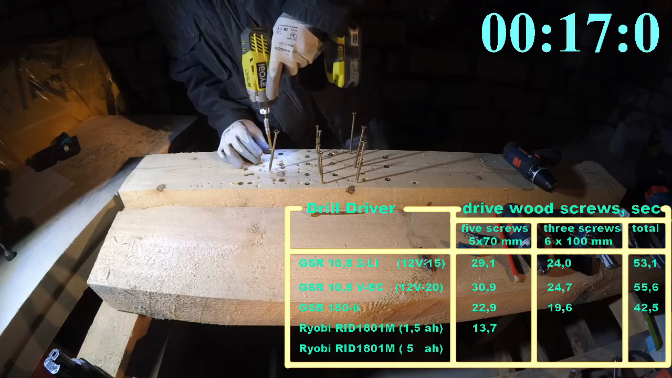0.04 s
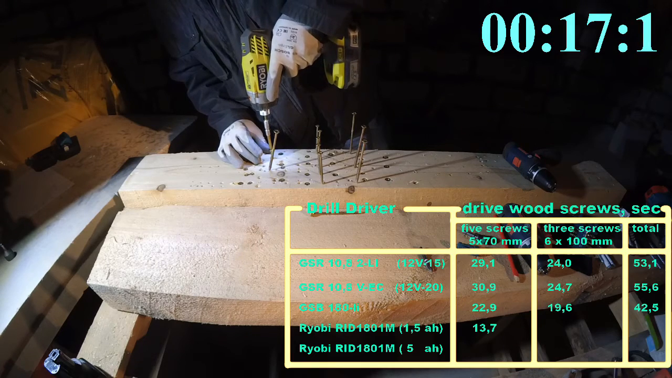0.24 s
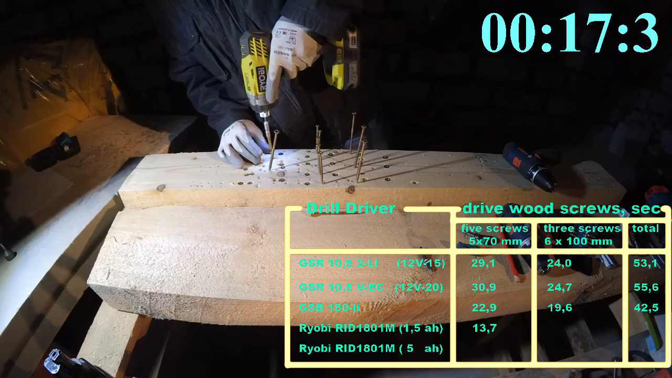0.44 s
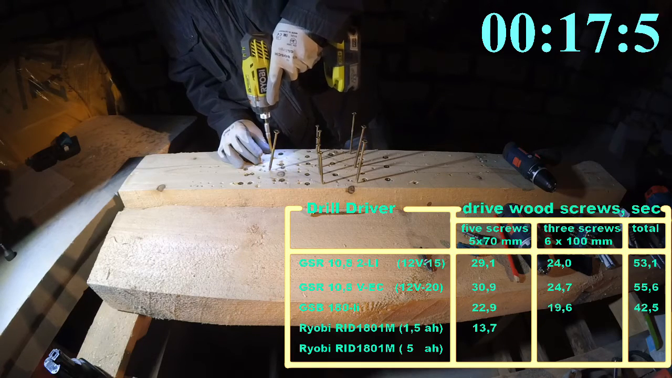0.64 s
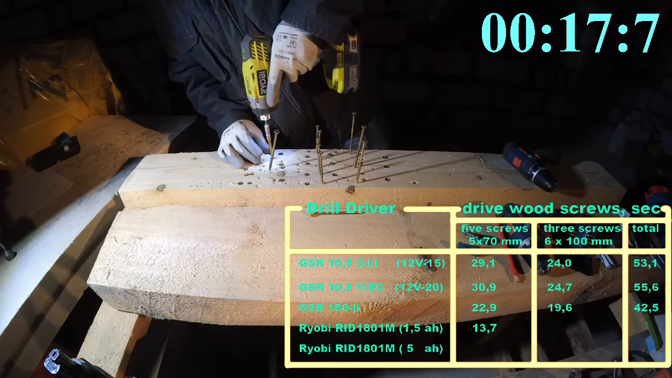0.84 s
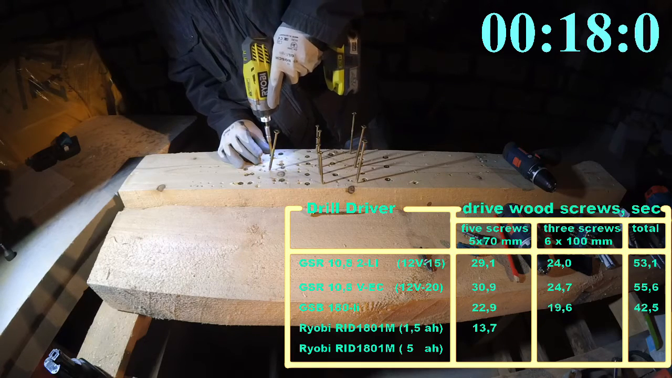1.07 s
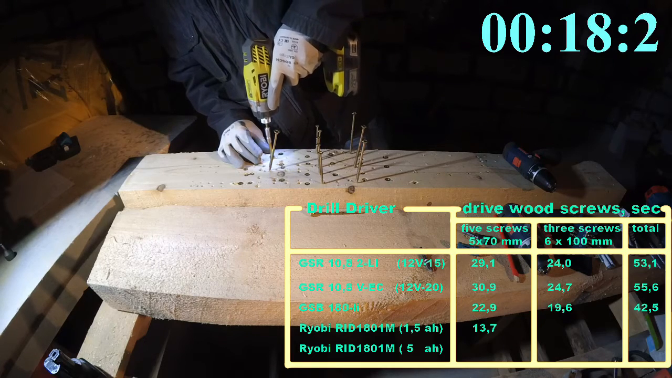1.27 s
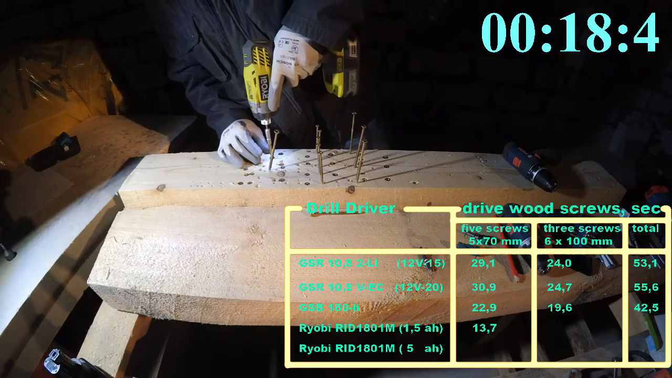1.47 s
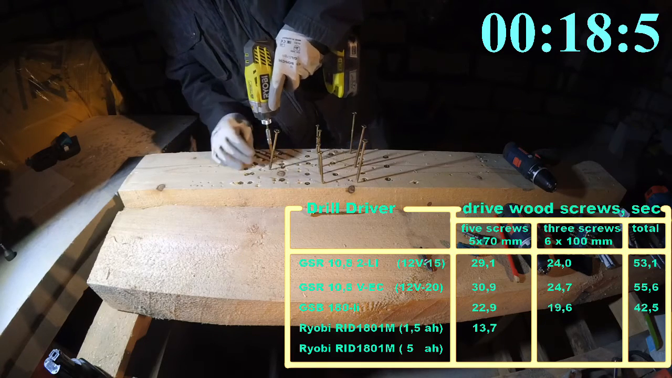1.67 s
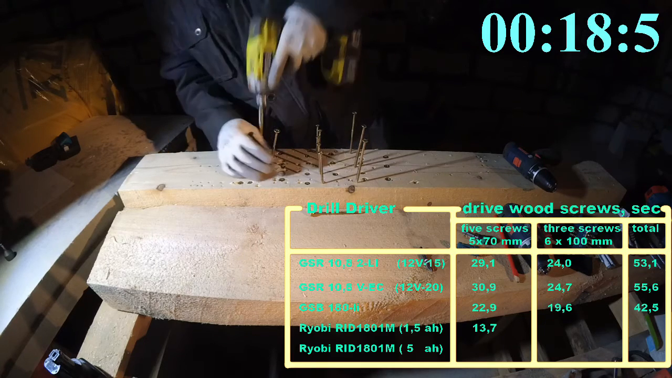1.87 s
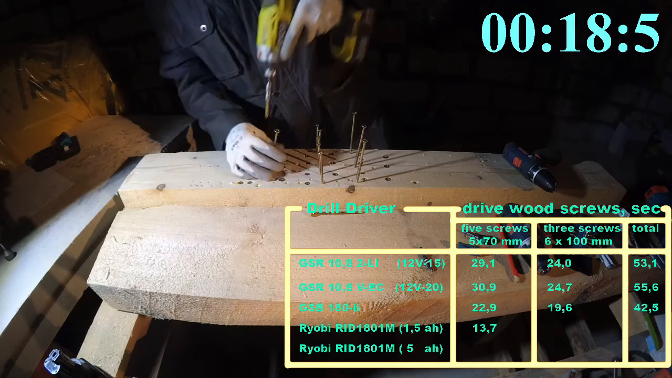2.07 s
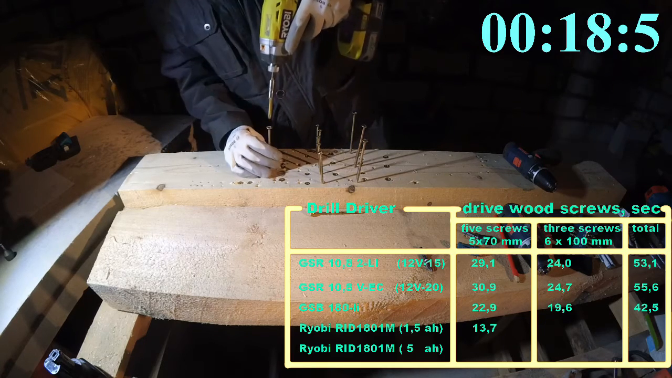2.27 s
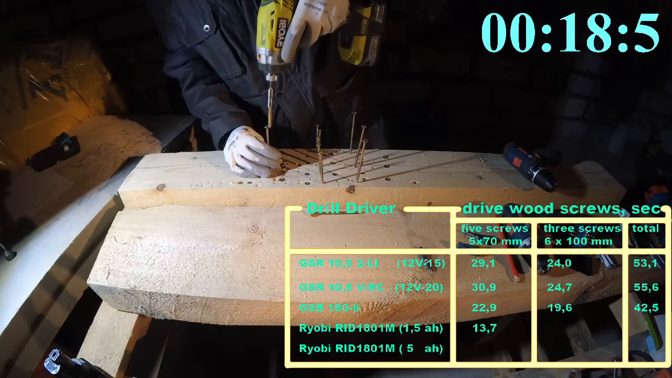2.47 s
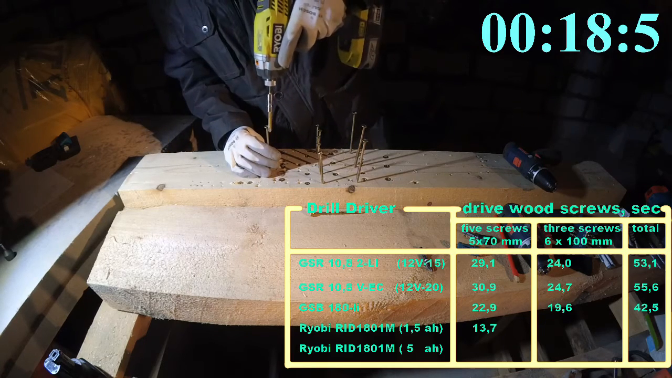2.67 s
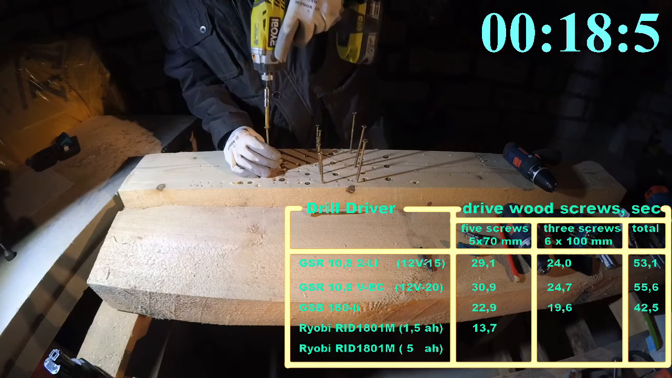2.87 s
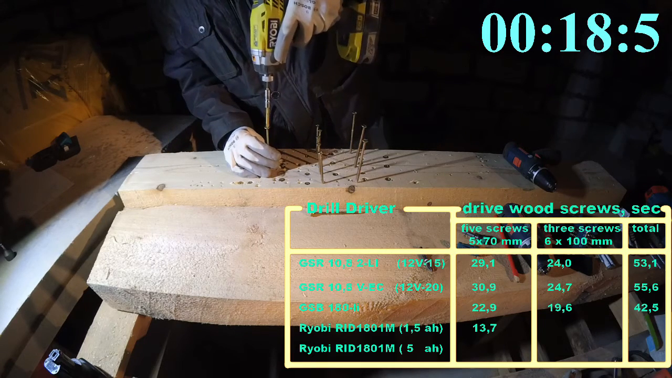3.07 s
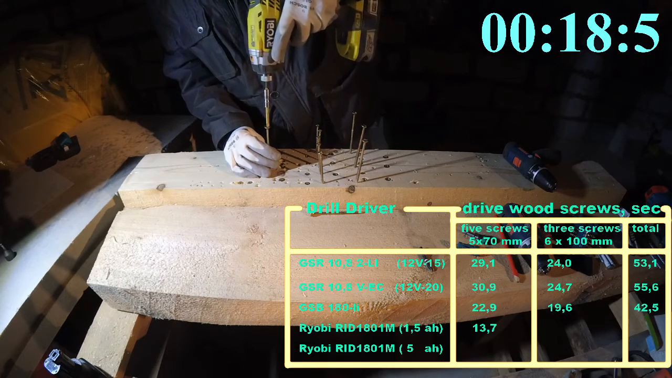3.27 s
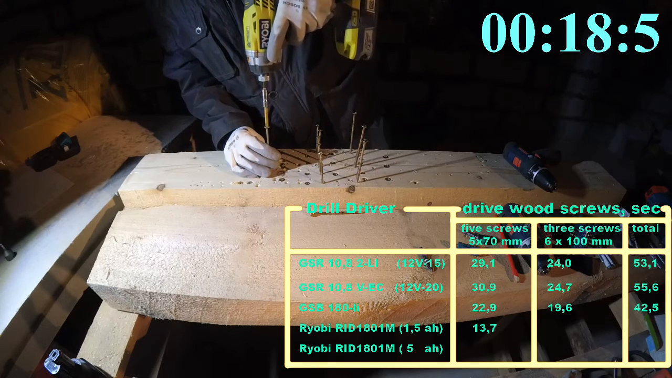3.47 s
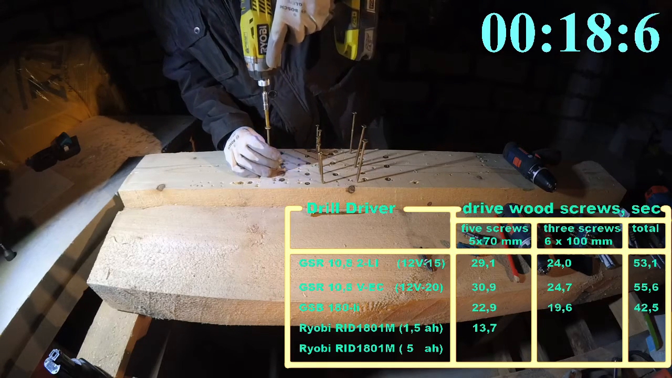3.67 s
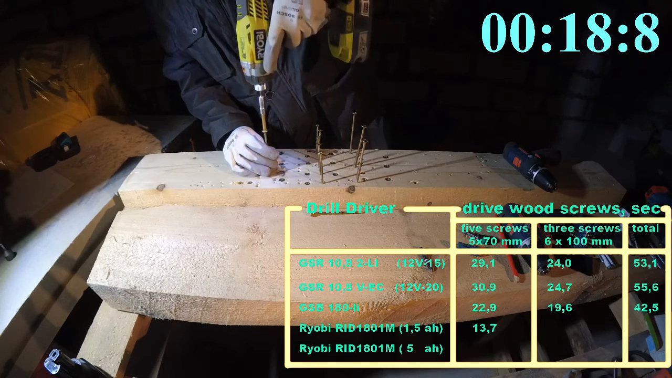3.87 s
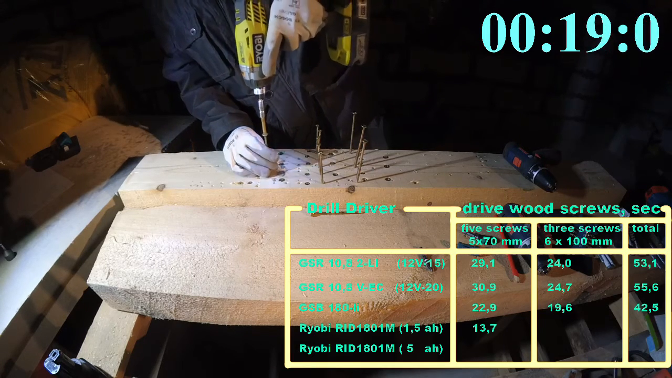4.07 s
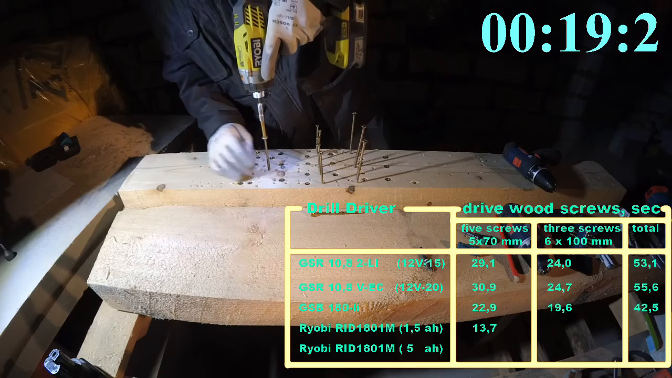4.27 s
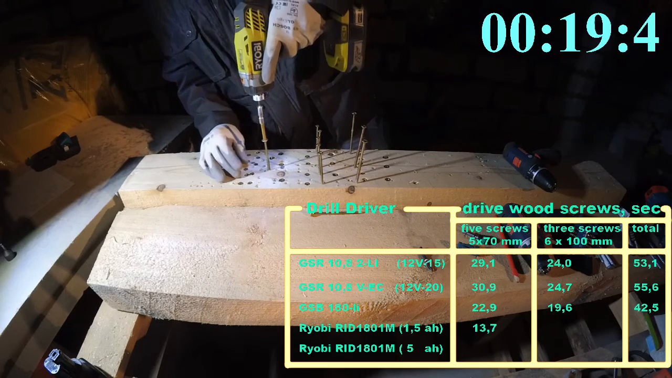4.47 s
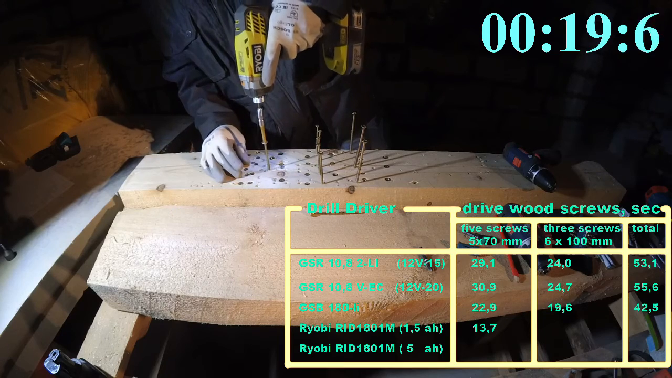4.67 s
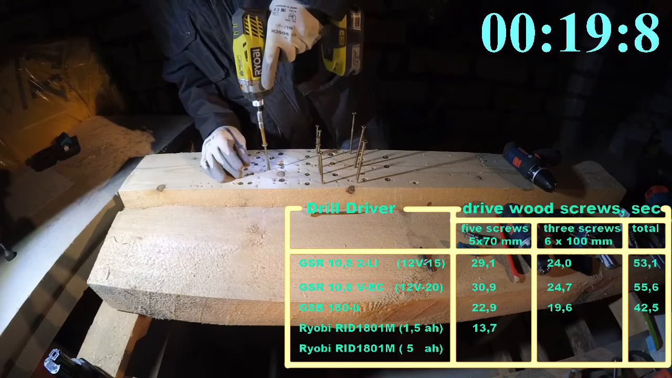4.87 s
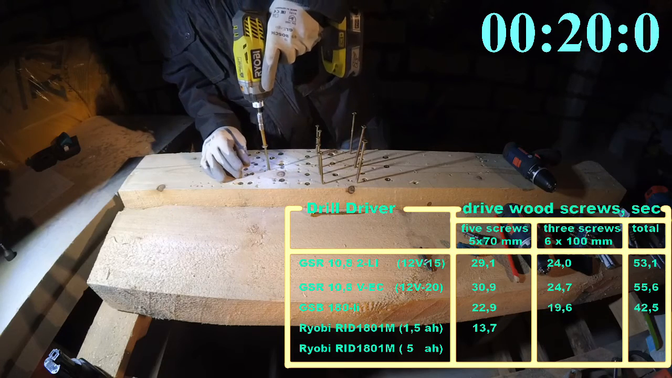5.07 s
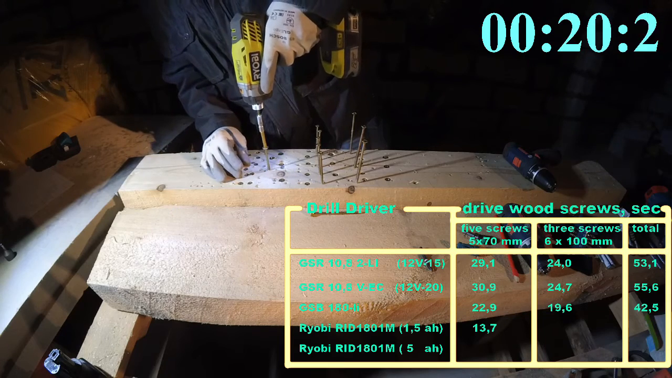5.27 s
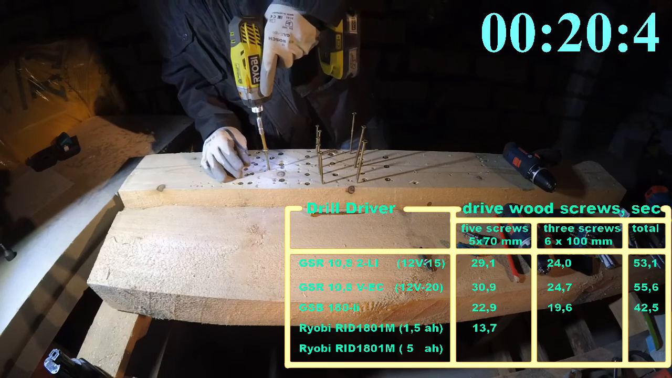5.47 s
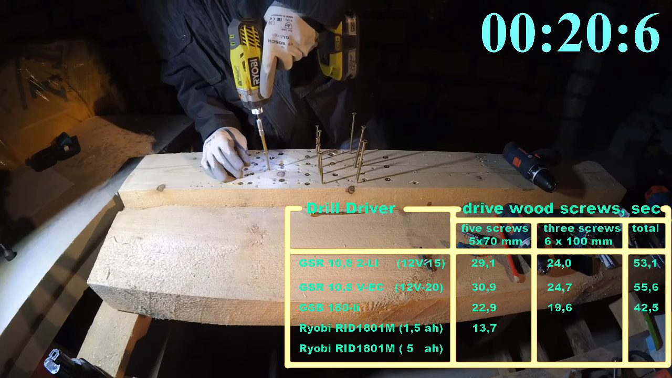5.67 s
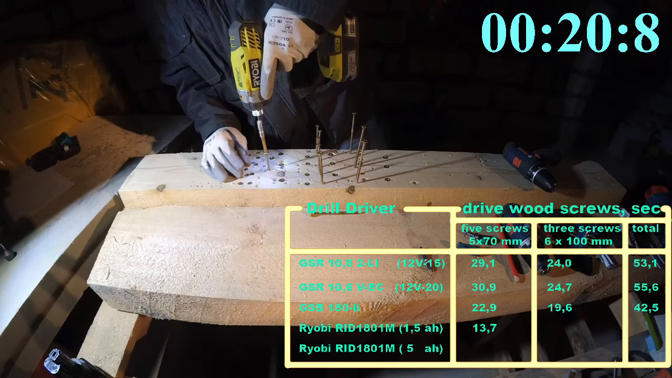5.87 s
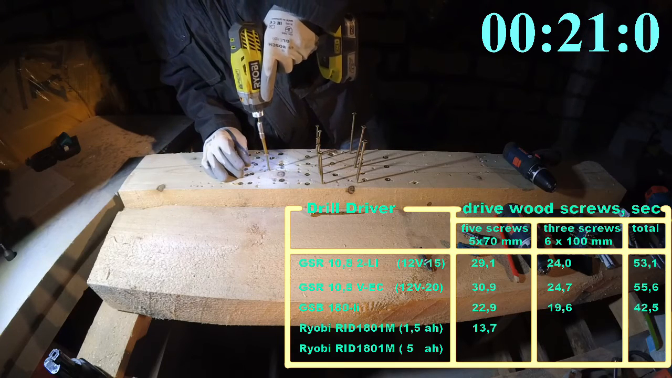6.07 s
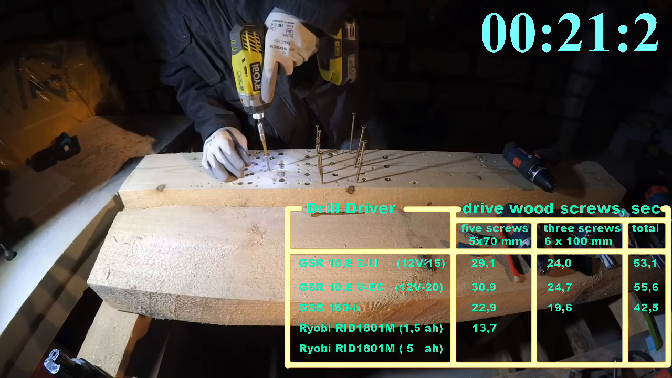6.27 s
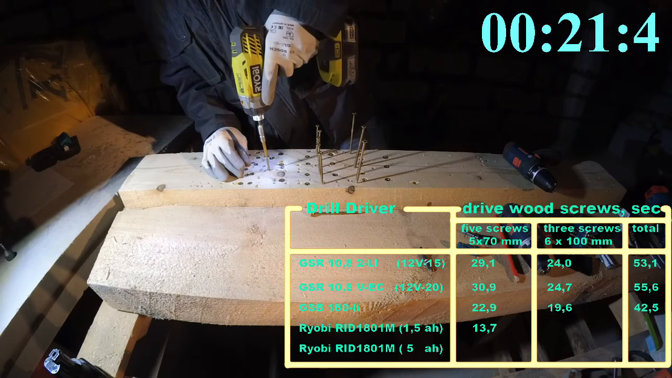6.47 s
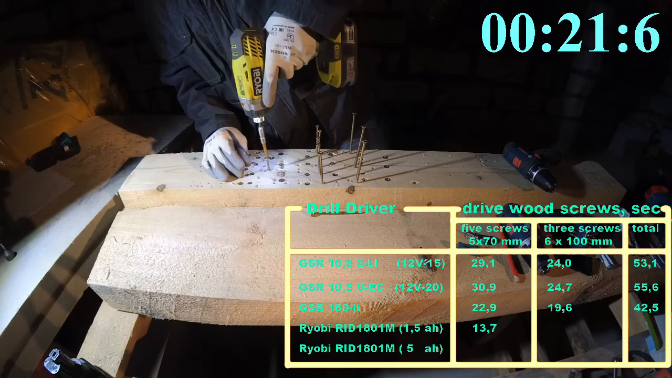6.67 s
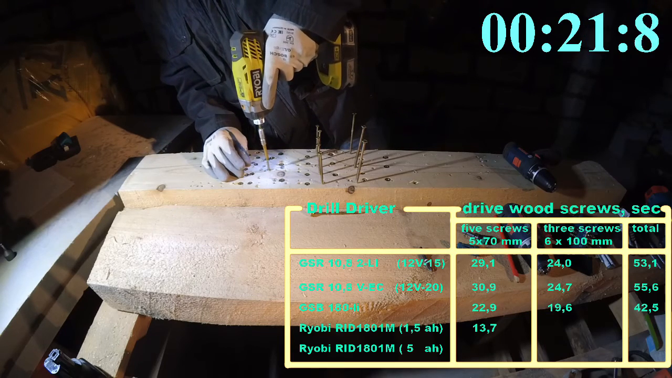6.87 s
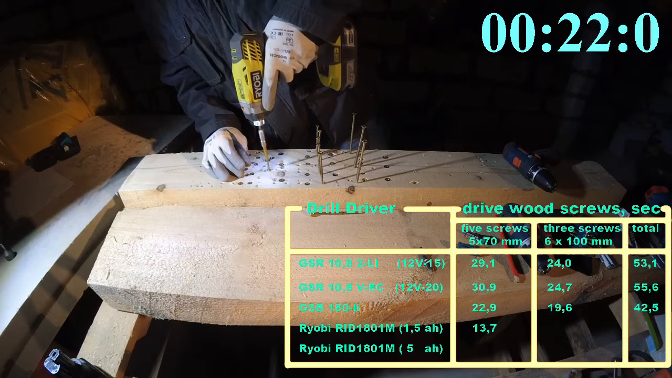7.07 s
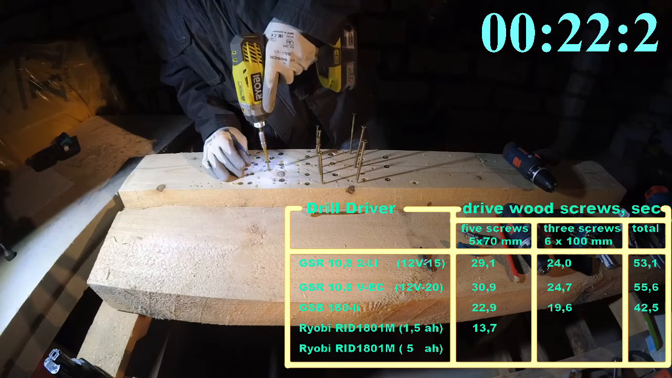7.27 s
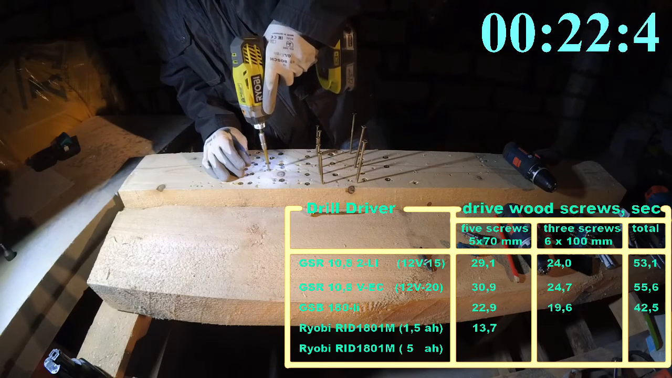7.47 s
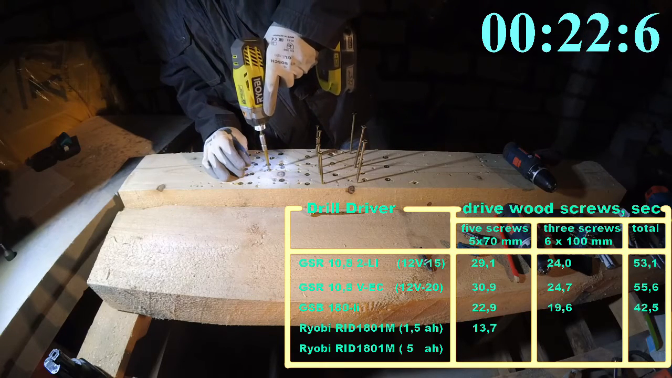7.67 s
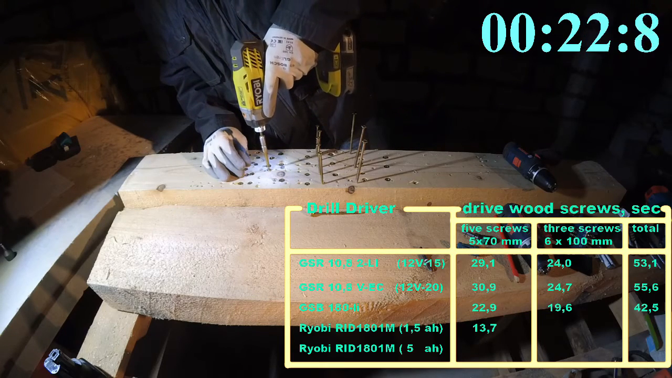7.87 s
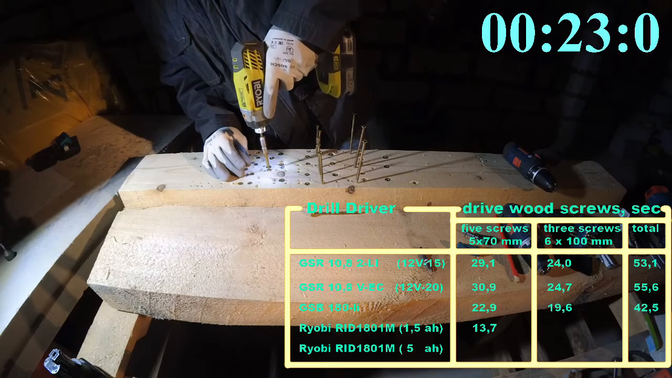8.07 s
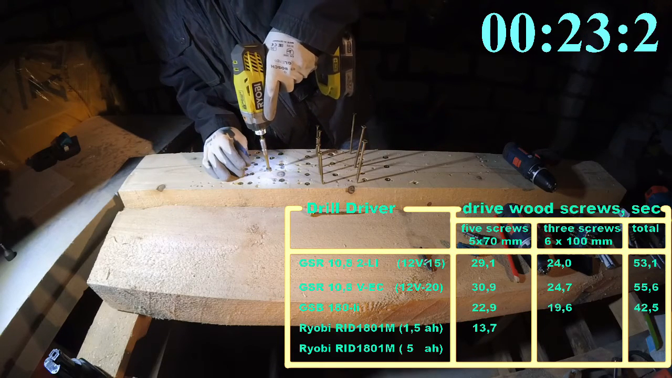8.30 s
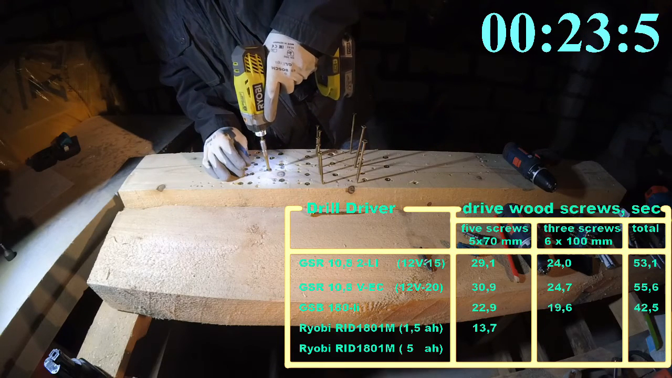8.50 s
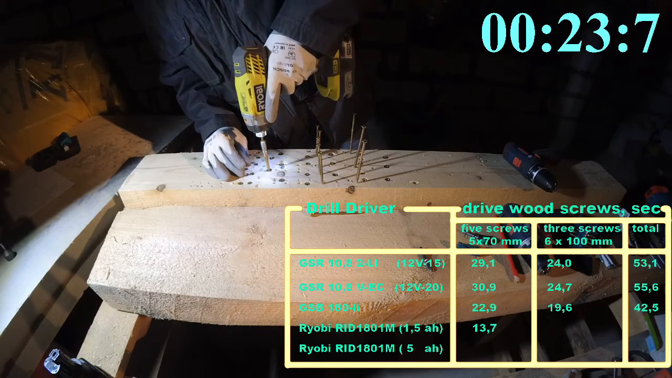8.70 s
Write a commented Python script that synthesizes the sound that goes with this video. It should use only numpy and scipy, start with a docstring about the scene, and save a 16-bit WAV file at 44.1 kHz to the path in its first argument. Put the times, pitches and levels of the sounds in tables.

```python
"""Rapid hammer blows over a whirring motor: a cordless impact driver sinks a screw into a timber beam.
Each blow is a burst of cracking noise that rings the screw and the beam, then a weaker rebound.
Between two screws the bit clicks into the new head and the motor spins freely as whirr and gear tones.
The second screw adds a squeal of wavering sines as it bites. A diffuse tail gives the small workshop;
the close mono microphone limits the peaks."""
import sys
import numpy as np
from scipy import signal
from scipy.fft import rfft, irfft
from scipy.io import wavfile
from scipy.ndimage import uniform_filter1d, minimum_filter1d

SR = 44100
rng = np.random.default_rng(int(sys.argv[2]) if len(sys.argv) > 2 else 0)


def to_wav(sig):
    """Store sig (one row per channel, or 1-D mono) as 16-bit WAV at the path in sys.argv[1].

    Samples outside -1..1 are clipped; the rate is SR.
    """
    pcm = np.clip(np.atleast_2d(sig), -1, 1) * 32767
    pcm = np.round(pcm).astype(np.int16)
    wavfile.write(sys.argv[1], SR, pcm.T)  # frames by channels


N = 385434
TIME = np.arange(N) / SR


def undb(db):
    """Turn decibels into an amplitude factor."""
    return 10 ** (np.asarray(db) / 20)


def unit(x):
    """Scale to rms 1."""
    return x / np.sqrt(np.mean(x ** 2))


def curves(rows):
    """Automation: columns of a table, joined by straight lines in time."""
    seconds, *columns = np.transpose(rows)
    return [np.interp(TIME, seconds, column) for column in columns]


def spectrum(points, hz):
    """Read a table on a log-frequency axis."""
    f, value = np.transpose(points)
    return np.interp(np.log(hz + 1), np.log(f), value)


def ring(x, response):
    """Play x through an impulse response."""
    return signal.oaconvolve(x, response)[:len(x)]


def colour(x, points, size=4096):
    """EQ with the given spectrum, as a causal minimum-phase filter with no pre-ring."""
    log_gain = np.log(undb(spectrum(points, np.fft.rfftfreq(size, 1 / SR))))
    cepstrum = irfft(log_gain)
    # folding the cepstrum onto positive time makes the filter causal
    cepstrum[1:size // 2] *= 2
    cepstrum[size // 2 + 1:] = 0
    return ring(x, irfft(np.exp(rfft(cepstrum)))[:size // 2])


def noise(points):
    """Coloured noise of rms 1."""
    return unit(colour(rng.standard_normal(N), points))


def modes(x, table):
    """Ring a set of damped resonances; a wider mode dies sooner."""
    t = TIME[:SR // 5]
    response = 0
    for hz, width_hz, db in table:
        decay = np.exp(-np.pi * width_hz * t)
        response = response + undb(db) * width_hz * decay * np.cos(2 * np.pi * hz * t)
    return ring(x, response / SR)


def walk(rate_hz):
    """Smoothed random drift of rms 1, with a new random value rate_hz times a second."""
    k = max(int(SR / rate_hz), 1)
    steps = np.repeat(rng.standard_normal(N // k + 1), k)
    return unit(uniform_filter1d(steps, k)[:N])


def taps(times, sizes):
    """One impulse for each event."""
    return np.bincount(np.clip(times * SR, 0, N).astype(int), sizes, N + 1)[:N]


def rattle(hits, rise_s, decay_s):
    """Each impulse becomes a short noisy swarm of metal contacts."""
    t = TIME[:SR // 20]
    shape = (1 - np.exp(-(t / rise_s) ** 2)) * np.exp(-t / decay_s)
    return ring(hits, shape) * rng.standard_normal(N)


def delay(x, lag_s):
    """The same sound, later."""
    return np.pad(x, (int(lag_s * SR), 0))[:N]


def envelope(start_s, end_s, attack_s, release_s):
    """Exponential attack, hold and release."""
    since, after = np.maximum(TIME - start_s, 0), np.maximum(TIME - end_s, 0)
    return (1 - np.exp(-since / attack_s)) * np.exp(-np.minimum(after / release_s, 20))


# colour of the quiet air: pitch_hz, level_db
AIR_COLOUR = [(200, 4), (400, -1), (650, -2.5), (900, 0.5), (1300, -4), (2000, -16), (3500, -26),
              (8000, -27), (15000, -33)]


def air():
    """Quiet noise floor, weighted to the low end, with a slow uneven level."""
    return noise(AIR_COLOUR) * undb(-48 + 1.1 * walk(9))


# colour of the low rumble: pitch_hz, level_db
RUMBLE_COLOUR = [(12, -1.5), (24, 7), (45, -4.5), (80, -11.5), (150, -15.5), (260, -28), (600, -59)]


def rumble(rest_db=-49.5, swell_db=-35.8):
    """Low noise that swells while the tool is moved to the next screw."""
    moving = envelope(start_s=1.65, end_s=3.0, attack_s=.12, release_s=.55)
    return noise(RUMBLE_COLOUR) * (undb(rest_db) + undb(swell_db) * moving)


# the beam shifts as the worker's weight comes off and goes back on: start_s, end_s, level_db
BEAM_BUMPS = [(1.6, 1.69, -32.5), (3.51, 3.69, -37)]
# colour of these bumps: pitch_hz, level_db
BUMP_COLOUR = [(25, -14), (65, 0), (120, 0), (180, -7), (300, -24), (800, -55)]


def bumps(attack_s=.02, release_s=.09):
    """Dull knocks of the beam shifting on its trestle: low noise in short envelopes."""
    level = sum(undb(db) * envelope(start_s, end_s, attack_s, release_s) for start_s, end_s, db in BEAM_BUMPS)
    return noise(BUMP_COLOUR) * level


# colour of brushing cloth: pitch_hz, level_db
CLOTH_COLOUR = [(200, -16), (900, 2), (2500, -3), (6000, -8), (10000, -12), (15000, -22)]


def sleeve():
    """The sleeve brushes along as the tool is lifted: unevenly fluttering noise."""
    stroke = envelope(start_s=1.79, end_s=2.03, attack_s=.03, release_s=.22)
    return noise(CLOTH_COLOUR) * stroke * undb(-51 + 1.4 * walk(40.2) + 2 * walk(600))


# bit, screw head and trigger being handled: start_s, relative level_db, decay_s, tilt_db_per_octave
HANDLING_CLICKS = [(2.155, -53, .003, 6), (2.209, -42, .002, 3), (2.351, -54, 0.016, 0),
                   (2.507, -38, 0.0053, 0), (2.533, -32, .004, 3), (2.543, -26, 0.0055, 1.5),
                   (2.799, -51, 0.03, -3), (2.834, -47, .016, 0), (2.994, -38, 0.012, 0),
                   (3.016, -39.5, 0.018, -4), (3.312, -34, .003, 0), (3.324, -35, .003, 3),
                   (3.331, -32, .004, 0), (3.354, -38, 0.0096, -3), (3.374, -37, 0.0073, -4),
                   (3.495, -45, .003, 5), (3.540, -27.5, 0.0024, -.5), (3.593, -51, .012, 7),
                   (3.619, -23, 0.0019, 2), (3.664, -17.5, 0.0022, 1.5)]
# colour of the direct click: pitch_hz, level_db
CLICK_COLOUR = [(100, 2), (500, -2.5), (900, 2), (1500, 0.5), (3000, -0.5), (4800, -4), (8000, -4.5),
                (15000, -20)]


def handling():
    """Small gritty contacts of steel on steel, decaying noise that also wakes the beam and the screw."""
    out, t = np.zeros(N), TIME[:SR // 6]
    hz = np.fft.rfftfreq(len(t), 1 / SR)
    lead = SR // 100  # room for the tilt filter to spread ahead of the click
    for start_s, db, decay_s, tilt_db in HANDLING_CLICKS:
        grit = rng.standard_normal(len(t)) * np.exp(-t / decay_s)
        tilt = undb(tilt_db * np.log2((hz + 500) / 4000))
        tilted = irfft(rfft(np.roll(grit, lead)) * tilt, len(t))
        start = int(start_s * SR) - lead
        out[start:start + len(t)] += undb(db) * tilted
    click = undb(5) * colour(out, CLICK_COLOUR)
    return click + undb(21) * modes(out, BEAM_MODES) + undb(2) * modes(out, SCREW_2_MODES)


# trigger pulls: start_s, load_s (screw takes the load), end_s, relative loaded level_db
TRIGGER_PULLS = [(-1, -.9, 1.65, -20.5), (3.625, 3.88, 9, -22)]
# colour of the fan and gear whirr: pitch_hz, level_db
WHIRR_COLOUR = [(59, -26), (100, -12), (126, -5.5), (184, -19.5), (467, -19.5), (825, -6), (1180, -9.5),
                (2000, -9.5), (2270, -7), (2690, -7), (4560, -2.5), (15500, -12)]
# the motor spinning freely: time_s, shaft_turns_per_s
SHAFT_SPEED = [(3.63, 366.0), (3.7, 385.5), (3.724, 364.9), (3.774, 405.5), (3.852, 364.9), (3.91, 371.2)]
# gear and commutator tones: multiple of the shaft rate, relative level_db
GEAR_TONES = [(6, 2), (8, -12), (10, -6), (11, -13), (12, 0.5), (14, -9.5)]
SPIN_UP_S, LOAD_S, RUN_DOWN_S = .012, .035, .026
PRESSED_HOME_S = 3.85  # the bit is fully home in the screw head


def motor():
    """Fan and gear whirr that grows under load, with tones at multiples of the free shaft rate."""
    gain = 0
    for start_s, load_s, end_s, loaded_db in TRIGGER_PULLS:
        free = undb(-29.7) * envelope(start_s, end_s, SPIN_UP_S, RUN_DOWN_S)
        loaded = undb(loaded_db) * envelope(load_s, end_s, LOAD_S, RUN_DOWN_S)
        gain = gain + np.maximum(free, loaded)
    whirr = noise(WHIRR_COLOUR) * gain * undb(3.3 * walk(400) + 2)

    turns_per_s, = curves(SHAFT_SPEED)
    phase = 2 * np.pi * np.cumsum(turns_per_s * (1 + .004 * walk(300))) / SR
    whine = sum(np.sin(order * phase) * undb(db + 2 * walk(120)) for order, db in GEAR_TONES)
    # louder by 85 dB per second until the bit is pressed home, then fading as the screw takes the load
    whine_db = -27 + 85 * np.minimum(TIME - PRESSED_HOME_S, 0)
    pressed = envelope(TRIGGER_PULLS[-1][0], PRESSED_HOME_S, SPIN_UP_S, release_s=.06)
    return whirr + whine * pressed * undb(whine_db)


def squeal(row, waver=0.00708, flutter_db=3, settle_s=.17):
    """A thin sine that settles in pitch, wavers and flutters."""
    start_s, end_s, first_hz, settled_hz, db, attack_s, release_s = row
    settling = np.exp(-np.maximum(TIME - start_s, 0) / settle_s)
    hz = settled_hz + (first_hz - settled_hz) * settling
    phase = 2 * np.pi * np.cumsum(hz * (1 + waver * walk(350))) / SR
    return np.sin(phase) * envelope(start_s, end_s, attack_s, release_s) * undb(db + flutter_db * walk(130))


# the closing trigger: start_s, end_s, first_hz, settled_hz, level_db, attack_s, release_s
TRIGGER_SONG = (3.603, 3.632, 7450, 6800, -44, .005, .015)


def trigger_tone():
    """The speed control sings briefly as the trigger closes: one thin, high sine."""
    return squeal(TRIGGER_SONG)


# thread in the wood: start_s, end_s, first_hz, settled_hz, relative level_db, attack_s, release_s, # dip_db
# (deepest dip, at each blow)
THREAD_SQUEALS = [(3.919, 3.935, 4300, 4320, -16, .005, .007, 0),
                  (3.95, 4.03, 4530, 4850, -26, .01, .02, 0), (4.05, 4.17, 4640, 4110, -13, .045, .45, 4),
                  (4.55, 5.4, 4100, 4110, -16, .25, 3.2, 15)]


def thread_squeal(loudest_cycle=.54):
    """The second screw squeals in the wood, swelling about half a cycle after each blow as it turns."""
    hammering = TIME >= BLOW_RATE_2[0][0]
    turns = np.cumsum(curves(BLOW_RATE_2)[0] * hammering) / SR
    resting = np.sin(np.pi * (turns - loudest_cycle)) ** 2
    return sum(squeal(row, waver=0.00791, flutter_db=2) * undb(-dip_db * resting)
               for *row, dip_db in THREAD_SQUEALS)


def hammer(rate, lone, rebound_db=-8, rebound_share=.53, scatter_db=1.0, rebound_scatter_db=1.5,
           jitter_s=.00017, rebound_jitter_s=.00042):
    """Impulses of the hammer on the anvil, and of its rebound about half a cycle later."""
    hz, = curves(rate)
    on = (TIME >= rate[0][0]) & (TIME <= rate[-1][0])
    turns = np.cumsum(hz[on]) / SR
    times = np.interp(np.arange(turns[-1]), turns, TIME[on])
    chance = rng.standard_normal((4, len(times)))
    times = times + jitter_s * chance[0]
    blows = taps(times, undb(scatter_db * chance[1])) + taps(lone[:, 0], undb(lone[:, 1]))
    back = times + rebound_share / np.interp(times, TIME, hz) + rebound_jitter_s * chance[2]
    rebounds = taps(back, undb(rebound_db + rebound_scatter_db * chance[3]))
    return blows, rebounds, on


# hammering on each screw: time_s, blows_per_s
BLOW_RATE_1 = [(0.023, 50.57), (0.9, 50.36), (1.15, 50.63), (1.4, 52.28), (1.62, 55.32)]
BLOW_RATE_2 = [(4.047, 43.5), (4.15, 46.92), (4.55, 49.77), (4.75, 48.31), (5.3, 49.7), (6.4, 50.56),
               (7.0, 50.41), (8.35, 51.78), (8.75, 55.62)]
# single blows and rebounds as the hammer stops and starts: time_s, level_db against a steady blow
SINGLE_BLOWS = [(1.636, 3), (1.655, -9), (1.664, 3), (1.677, -11), (1.702, -5), (1.721, -16), (1.749, -25),
                (3.912, -9), (3.941, -1), (3.971, -1), (3.999, 2), (4.023, 2.5)]
# each screw at the steady pace, rows crack, screw ring, thud: relative level_db,
# change_db_per_s as the screw sinks
BLOW_STRENGTH_1 = [(-20.2, 1.2), (-17.2, .6), (-29.3, 2.2)]
BLOW_STRENGTH_2 = [(-11.9, -1.15), (-15.4, -.2), (-26.7, -.3)]
# effect of pace, rows crack, screw ring, thud: loss_db per blow/s below the steady pace,
# gain_db per blow/s above it
PACE_RESPONSE = [(.65, .75), (1.05, -.1), (.5, .3)]
# level of the beam's ring under each screw: time_s, relative level_db
BEAM_LEVEL_1 = [(0.0, -17.8), (0.2, -27.7), (0.6, -23.7), (0.7, -28.4), (1.2, -30.4), (1.7, -21.9)]
BEAM_LEVEL_2 = [(4.05, -29.9), (5.35, -26.5), (5.87, -30.3), (6.65, -23.4), (7.69, -23.8), (7.95, -27.4),
                (8.47, -23.0), (8.73, -28.1)]
# modes of bit and screw: pitch_hz, width_hz, relative level_db
SCREW_1_MODES = [(1335, 70, -2), (1645, 77, -10.5), (1910, 140, -8.5), (2140, 130, -5), (2980, 54, -10),
                 (3140, 70, -4.5), (3350, 73, -5.5), (3770, 190, 2.5), (4074, 63, 3)]
SCREW_2_MODES = [(1370, 97, -3.5), (1928, 220, 2), (2120, 84, -24), (2510, 67, -5.5), (2890, 105, 5),
                 (3045, 79, -5), (3060, 47, -17), (3710, 150, 5.5), (4004, 63, 2.5)]
# modes of the beam along and across the grain: pitch_hz, width_hz, relative level_db
BEAM_MODES = [(836.5, 12.8, 14), (876, 35, -4), (747, 14, -24), (1280, 34, -18.5)]
# low beam modes as each screw wakes them: pitch_hz, width_hz, relative level_db
THUD_1_MODES = [(100, 27, -12), (157, 4.6, 6), (201, 24, -9), (352, 35, -2.5), (451, 14, 5),
                (263, 30, -15.5)]
THUD_2_MODES = [(97, 43, -15.5), (156.1, 4, 2), (190, 30, -13), (279, 26, -5.5), (352.2, 15, 1),
                (390, 27, -4.5), (462.7, 19, 1), (568, 60, -10.5)]
# colours of the crack, the bit's knock and the dull push on the beam: pitch_hz, level_db
CRACK_COLOUR = [(200, -20.5), (1000, -13), (3000, -3), (5000, -2), (7700, 1.5), (9300, -1), (11000, -8),
                (13000, -14), (15500, -19.5)]
KNOCK_COLOUR = [(40, -45.5), (250, 2.5), (600, -7.5), (1100, 2.5), (1600, -0.5), (2400, -2), (3500, 13),
                (4500, -12.5), (7000, -19), (15000, -35)]
PUSH_COLOUR = [(25, -5), (50, 4.5), (100, -0.5), (200, -3.5), (600, 2.5), (1200, -34.5), (5000, -61)]
# the hammer labours below this pace as the thread bites and races above it as the head seats
STEADY_BLOWS_PER_S = 50.5


def drive(rate, strength, beam_level, screw_modes, thud_modes):
    """One screw: a crack on each blow, then bending waves down the screw and into the beam."""
    first_s, last_s = rate[0][0] - .5, rate[-1][0] + .5
    lone = np.array([row for row in SINGLE_BLOWS if first_s < row[0] < last_s])
    blows, rebounds, on = hammer(rate, lone)
    sinking_s = np.cumsum(on) / SR
    pace = curves(rate)[0] - STEADY_BLOWS_PER_S
    crack_db, screw_db, thud_db = (db + db_per_s * sinking_s + pace * np.where(pace < 0, *slopes)
                                   for (db, db_per_s), slopes in zip(strength, PACE_RESPONSE))
    # the beam hardly rings until the thread has gripped it: 1 dB lost per blow/s below the steady pace
    beam_db = curves(beam_level)[0] + np.minimum(pace, 0)

    def level(x, db=0):
        """Scale to rms 1 during the hammering, then apply a gain."""
        return x * undb(db) / np.sqrt(np.mean(x[on] ** 2))

    crack = colour(rattle(blows + undb(-5) * rebounds, rise_s=.00033, decay_s=.0011), CRACK_COLOUR)

    # the screw takes a clean shove and the chatter of the bit in its head
    shove = delay(blows + undb(6) * rebounds, .0008)
    contact = level(rattle(shove, rise_s=.00023, decay_s=.002))
    screw_ring = modes(level(shove, 1.2) + contact, screw_modes)
    knock = colour(level(shove, -12.5) + contact, KNOCK_COLOUR)
    metal = level(screw_ring, -0.91) + level(knock, -6.5)

    # the wood feels each blow as one push, with a little scraping of the thread
    push = level(blows + undb(-7) * rebounds)
    beam = modes(delay(push + level(contact, -5.5), .00218), BEAM_MODES)
    low_ring = modes(push + level(contact, -13.5), thud_modes)
    thud = level(low_ring) + level(colour(push, PUSH_COLOUR), -4.5)

    wood = level(beam, beam_db + .5) + level(thud, thud_db)
    return level(crack, crack_db + 3.2) + level(metal, screw_db) + wood


# workshop decay: pitch_hz, t60_s
ROOM_DECAY = [(125, 1), (500, 0.72), (1300, 0.6), (2200, 0.49), (4000, 0.41), (8000, 0.27), (15000, 0.28)]


def diffuse(build_s=.0099):
    """Impulse response of the workshop: a dense noise tail that loses its treble first."""
    t = TIME[:SR * 3 // 4]
    hz = np.fft.rfftfreq(len(t), 1 / SR)
    white = rfft(rng.standard_normal(len(t)))
    edges = np.geomspace(180, SR / 2, 25)
    tail = 0
    for lo, hi in zip(edges, edges[1:]):
        band = irfft(white * ((hz >= lo) & (hz < hi)), len(t))
        t60_s = spectrum(ROOM_DECAY, np.sqrt(lo * hi))
        tail = tail + band * undb(-60 * t / t60_s)
    tail = tail * (1 - np.exp(-(t / build_s) ** 2))
    tone = [(200, -15), (450, -13.5), (800, -6), (2000, -3), (6000, -5.5), (15000, -6.5)]  # pitch_hz, level_db
    return colour(tail / np.sqrt(np.sum(tail ** 2)), tone)


def workshop(x, wet_db=-4.0, drift_hz=1.1):
    """Two near reflections and a diffuse tail whose pattern shifts as the tool and the worker move."""
    angle = 2 * np.pi * drift_hz * TIME
    wet = np.cos(angle) * ring(x, diffuse()) + np.sin(angle) * ring(x, diffuse())
    echoes = undb(-20.5) * delay(x, .0079) + undb(-19) * delay(x, .0118)
    near = signal.lfilter([1, -1], [1, -.85], echoes)  # thins the lows of the reflections
    return x + near + undb(wet_db) * wet


def scene(squeal_direct_db=-2, squeal_room_db=-9):
    """Tool, hands and room at one microphone, over a quiet floor."""
    first_screw = drive(BLOW_RATE_1, BLOW_STRENGTH_1, BEAM_LEVEL_1, SCREW_1_MODES, THUD_1_MODES)
    second_screw = drive(BLOW_RATE_2, BLOW_STRENGTH_2, BEAM_LEVEL_2, SCREW_2_MODES, THUD_2_MODES)
    tool = first_screw + second_screw + motor() + trigger_tone()
    # the squeal leaves the face of the beam and mostly reaches the microphone directly
    thread = thread_squeal()
    room = workshop(tool + handling() + sleeve() + undb(squeal_room_db) * thread)
    mono = room + undb(squeal_direct_db) * thread + air() + rumble() + bumps()
    return np.tile(mono, (2, 1))  # the same signal in both channels


def record(dry, ceiling=.8, hold_s=.00022, top_hz=15150):
    """A very fast limiter holds the tallest peaks down; a steep low-pass cuts the top."""
    size = max(int(hold_s * SR), 2)
    gain = (1 + (dry / ceiling) ** 6) ** (-1 / 6)
    gain = uniform_filter1d(minimum_filter1d(gain, size), size)
    low_pass = signal.ellip(10, .2, 70, top_hz, fs=SR, output="sos")
    return signal.sosfilt(low_pass, dry * gain)


dry = scene()
out = record(dry)
to_wav(out)
```